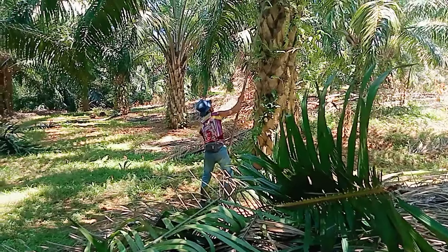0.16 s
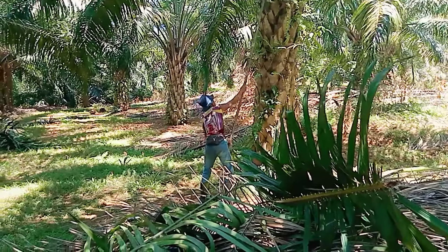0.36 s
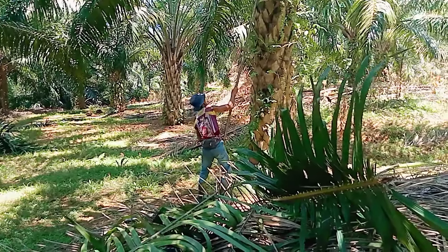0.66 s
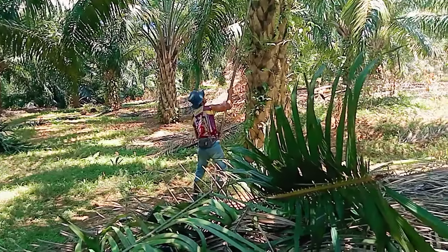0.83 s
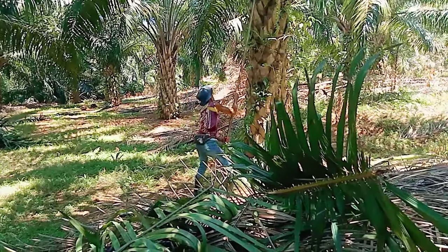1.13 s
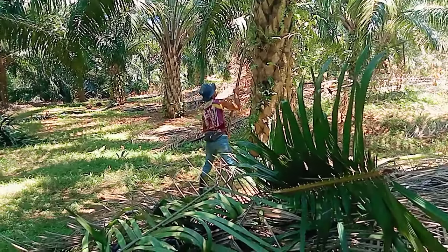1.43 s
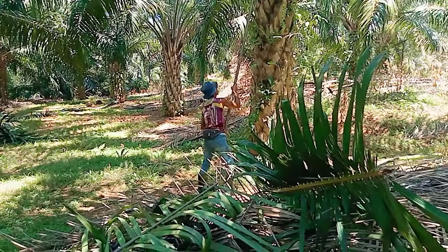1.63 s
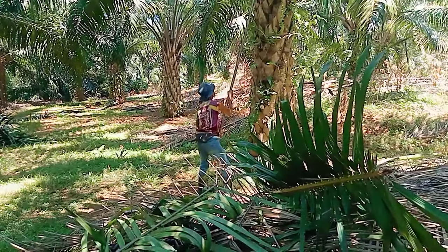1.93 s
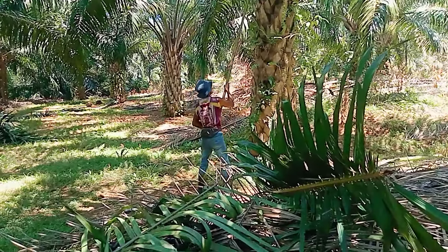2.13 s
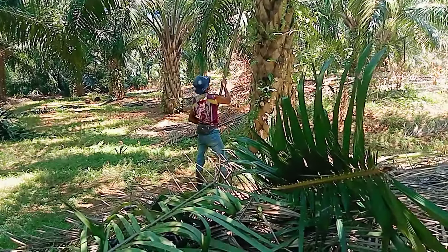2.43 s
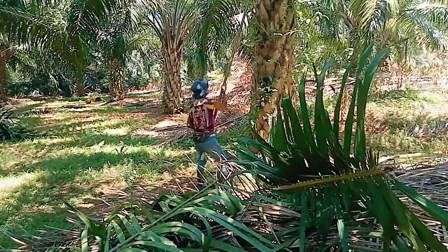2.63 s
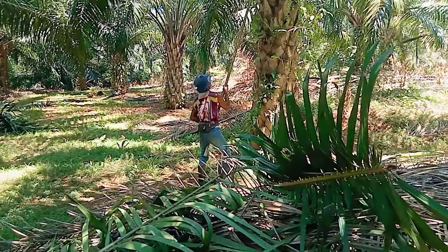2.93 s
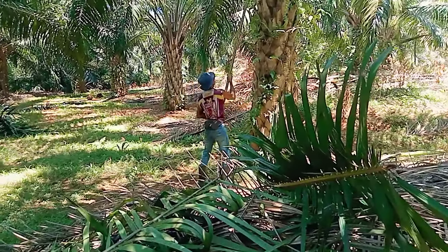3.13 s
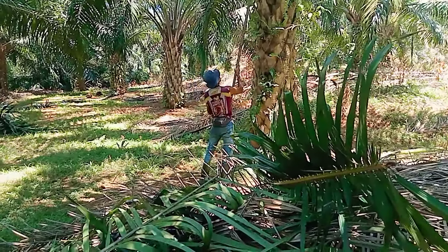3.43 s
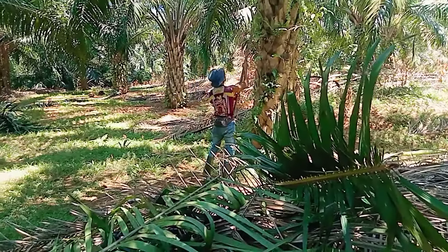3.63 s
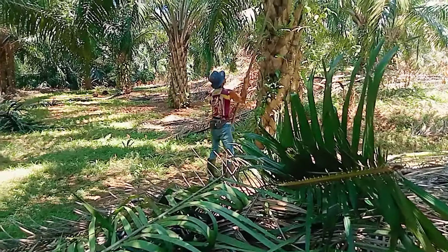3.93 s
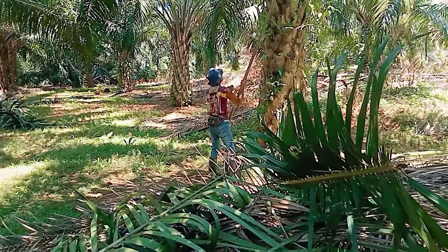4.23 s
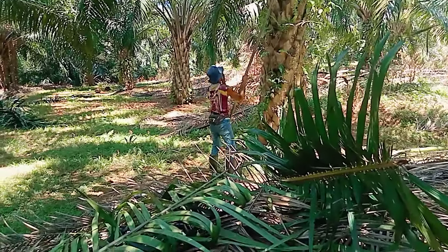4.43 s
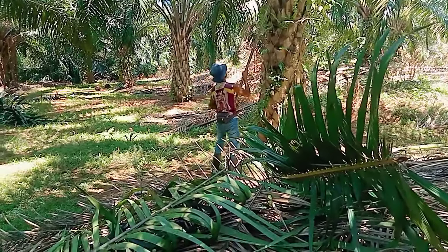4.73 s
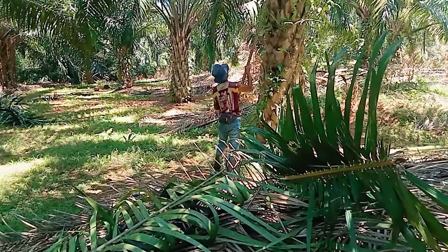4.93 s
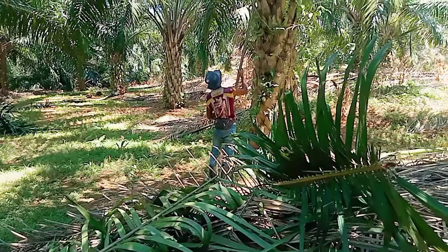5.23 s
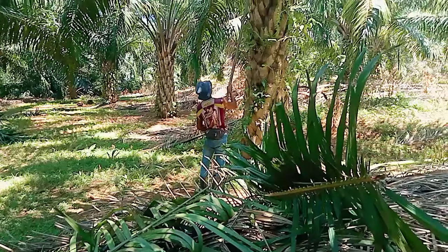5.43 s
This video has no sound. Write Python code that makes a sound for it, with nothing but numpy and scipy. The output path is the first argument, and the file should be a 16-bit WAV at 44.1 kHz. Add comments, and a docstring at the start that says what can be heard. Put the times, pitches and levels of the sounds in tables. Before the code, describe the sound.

A blade rasps through wet palm fibre with hollow knocks and cracks, then a frond tears loose and crashes down amid shrill insects.

```python
"""A blade rasps through wet fibre in short pulls, stalks knock and crack, and a palm frond tears loose and
crashes down through the leaves, while insects drone in the trees: a harvester works a sickle on a long pole.
Fibres and foliage are coloured trains of random clicks, stalks and steel are decaying modes, the pole is
a bank of resonators driven by the work. Insects are a click band with wavering tones; a noise tail is the
echo of the grove, and coloured noise is the open air."""
import sys
import numpy as np
from scipy import signal
from scipy.fft import rfft, irfft, next_fast_len
from scipy.io import wavfile

SR = 44100
rng = np.random.default_rng(int(sys.argv[2]) if len(sys.argv) > 2 else 0)


def materialize(psi):
    """Save the field psi as 16-bit PCM at rate SR to the path in sys.argv[1].

    A 1-D psi becomes a single channel; in a 2-D psi each row is a channel.
    """
    bounded = np.clip(np.atleast_2d(psi).T, -1, 1)
    quanta = np.round(bounded * 32767).astype(np.int16)
    wavfile.write(sys.argv[1], SR, quanta)


N = 245637
TIME = np.arange(N) / SR


def from_db(db):
    """Amplitude ratio: 20 dB for each factor of ten."""
    return 10 ** (np.asarray(db) / 20)


def rms_one(x):
    """Power normalisation: scale to a mean square of 1."""
    return x / np.sqrt(np.mean(x ** 2) + 1e-20)


def in_time(rows):
    """Linear interpolation: each column becomes a curve over time."""
    seconds, *columns = np.transpose(rows)
    return [np.interp(TIME, seconds, column) for column in columns]


def colour(x, spectrum):
    """Spectral shaping: weight x on a log-frequency axis, 20 dB per octave down beyond the ends; rms 1."""
    hz, db = np.transpose(spectrum)
    size = next_fast_len(N)
    octave = np.log2(np.fft.rfftfreq(size, 1 / SR) + 1)   # the 1 avoids log of zero
    points = np.log2(hz)
    beyond = np.abs(octave - np.clip(octave, points[0], points[-1]))
    gain = from_db(np.interp(octave, points, db) - 20 * beyond)
    return rms_one(irfft(rfft(x, size) * gain, size)[:N])


def below(x, hz):
    """First-order low-pass filtering; x minus this is the matching high-pass."""
    return signal.lfilter(*signal.butter(1, min(hz, SR / 2 - 1), fs=SR), x)


def drift(rate):
    """Slow random modulation: noise knots, rate per second, joined by lines; rms 1."""
    knots = rng.standard_normal(N)
    return rms_one(np.interp(TIME * rate, np.arange(N), knots))


def crackle(per_s, spread_db):
    """Random impulse train: independent clicks whose dB sizes are exponential, so a few stand far out."""
    sizes = from_db(spread_db * np.minimum(rng.exponential(1, N), 4))
    signs = rng.choice([-1, 1], N)
    return sizes * signs * (rng.random(N) < per_s / SR)


def ring(x, hz, t60):
    """Resonance: a two-pole filter in which a unit click starts a dying cosine of height 1."""
    radius = from_db(-60 / (t60 * SR))
    angle = 2 * np.pi * hz / SR
    zeros = [1, -radius * np.cos(angle)]
    poles = [1, -2 * radius * np.cos(angle), radius * radius]
    return signal.lfilter(zeros, poles, x + 1e-18)   # the offset keeps numbers out of the slow tiny range


def dying(t, t60):
    """Exponential decay: 60 dB down after t60 seconds."""
    return np.exp(-np.log(1000) * t / t60)


def add(out, s, sound):
    """Superposition: mix a sound in at time s."""
    start = int(s * SR)
    out[start:start + len(sound)] += sound[:N - start]


def swell_and_fade(s, swell_s, fade_s):
    """Exponential growth and decay: gain peaks at s; each slope is the time for 20 dB."""
    slopes = np.maximum((s - TIME) / swell_s, (TIME - s) / fade_s)
    return from_db(np.maximum(-20 * slopes, -120))


# Pulls of the blade through fibre. Each row: peak in seconds, level in dB, swell in seconds per 20 dB,
# brightness in dB (the gain of the edge; the body moves the other way by a quarter of it).
PULLS = [(.175, -48.5, .14, 0), (.512, -42, .011, 7), (.734, -35.5, .013, -3), (.812, -42, .19, 2),
         (1.232, -41.5, .1, -2), (1.333, -39.5, .01, 5), (1.379, -20.8, .05, 0), (1.41, -25.3, .012, 3),
         (1.455, -44, .1, 2), (1.488, -40, .02, -9), (1.822, -44.5, .035, -12), (2.15, -36, .03, 2),
         (2.202, -35.5, .022, -9), (2.355, -51, .06, -4), (2.381, -42.5, .018, 3), (2.6, -54, .04, -3),
         (2.928, -30.8, .05, -1), (2.985, -50, .08, 3), (3.27, -50, .04, -6), (3.297, -33, .016, -5),
         (3.565, -56, .03, 5), (4.083, -39, .025, -7)]
# Spectrum of parting fibre. Each row: frequency in Hz, relative density in dB per Hz.
FIBRE = [(100, -17), (220, -8), (420, -7), (620, -2), (950, -6), (1400, -6.5), (3000, -7.5), (3700, -12),
         (4900, -21), (6300, -17), (7500, -6), (9700, -21), (12500, -24), (15500, -24)]
# a pull fades by 20 dB in this time plus a share of its swell: slow pulls let go slowly
RELEASE_S, RELEASE_SHARE = .036, .22


def pulls():
    """Stick-slip friction: the blade parts thousands of fibres a second, catching and slipping as it goes."""
    catching = from_db(1.8 * drift(350))
    fibres = colour(crackle(per_s=11000, spread_db=3.0) * catching, FIBRE)
    body = below(fibres, hz=1700)
    edge = fibres - body
    body_power = edge_power = 0
    for s, db, swell, bright_db in PULLS:
        gain = from_db(db) * swell_and_fade(s, swell, RELEASE_S + RELEASE_SHARE * swell)
        body_power = body_power + gain ** 2 / from_db(bright_db / 2)
        edge_power = edge_power + gain ** 2 * from_db(bright_db) ** 2
    return body * np.sqrt(body_power) + edge * np.sqrt(edge_power)


# Chops that split a stalk. Each row: time of the crack in seconds, level in dB, settled pitch of the crack
# in Hz, settled pitch of the stalk giving way in Hz, splintering in dB re the crack.
CHOPS = [(2.1485, -18, 1250, 620, -9), (2.375, -24.5, 1500, 1100, -9), (2.593, -38, 400, 280, -5),
         (2.9283, -16, 1600, 640, -10.5), (3.2915, -15, 480, 270, -10.5), (4.3836, -11, 820, 680, -7.5)]
# Knocks against the stalks; the last row is a high second note of the final crack, played like a knock. Each
# row: start in seconds, level in dB, settled pitch in Hz.
KNOCKS = [(.737, -28.5, 1130), (1.188, -41, 600), (1.294, -29.5, 570), (1.368, -18, 560),
          (1.484, -27.5, 760), (1.816, -33, 430), (2.199, -23.5, 720), (2.209, -33, 260), (2.228, -35, 400),
          (2.856, -30, 640), (2.997, -34, 350), (3.338, -37, 330), (4.064, -30, 230), (4.075, -27, 420),
          (4.273, -24, 900), (4.331, -27, 830), (4.385, -12.5, 1520)]
# Dry leaflets and twigs snapping. Each row: start in seconds, level in dB.
SNAPS = [(1.063, -53), (1.305, -37), (2.098, -48), (2.332, -47), (2.479, -44.5), (2.593, -47), (2.856, -42),
         (4.225, -35), (5.028, -34)]
# Every "CYCLES" of ringing is the number in which a note dies by 60 dB; splintering is in dB re the blow.
KNOCK_CYCLES, KNOCK_SPLINTER_DB = 23, -16
CRACK_CYCLES = 14
# the stalk gives way with a thud just before it cracks: lead, level re the crack
GIVE_LEAD_S, GIVE_DB, GIVE_CYCLES = .0077, -7, 14
# the frond's last strands part one after another, at even steps
TEAR_S, TEAR_STEP_S, TEAR_DB = 4.2655, .0447, -16.5
TEAR_HZ, TEAR_CYCLES, TEAR_SPLINTER_DB = 800, 13, -21
SNAP_HZ, SNAP_CYCLES, SNAP_SPLINTER_DB = 1700, 36, -2
# cycles over which a note builds up: brittle breaks are sudden, knocks on wet stalks are soft
BREAK_CONTACT_CYCLES, KNOCK_CONTACT_CYCLES = .8, 1.15


def blows(strands=3):
    """Impact and fracture: lists every blow as (s, dB, Hz, ringing cycles, splinter dB, contact cycles)."""
    gives = [(s - GIVE_LEAD_S, db + GIVE_DB, hz, GIVE_CYCLES, KNOCK_SPLINTER_DB) for s, db, _, hz, _ in CHOPS]
    cracks = [(s, db, hz, CRACK_CYCLES, splinter_db) for s, db, hz, _, splinter_db in CHOPS]
    tears = [(TEAR_S + k * TEAR_STEP_S, TEAR_DB, TEAR_HZ, TEAR_CYCLES, TEAR_SPLINTER_DB)
             for k in range(strands)]
    snaps = [(s, db, SNAP_HZ, SNAP_CYCLES, SNAP_SPLINTER_DB) for s, db in SNAPS]
    breaks = [(*blow, BREAK_CONTACT_CYCLES) for blow in gives + cracks + tears + snaps]
    soft = [(s, db, hz, KNOCK_CYCLES, KNOCK_SPLINTER_DB, KNOCK_CONTACT_CYCLES) for s, db, hz in KNOCKS]
    return breaks + soft


# Modes of a stalk. Each row: multiple of its pitch, mean level in dB, share of the note's t60.
STALK = [(.4, -23, 1.2), (.65, -12, 1), (1, -1, 1), (1.8, -10, .9), (2.5, -21, .7)]


def knocks(splinter_t60=.016, glide=.3, settle_s=.003):
    """Modal vibration: a wet stalk gives a short hollow note; splitting fibres add a crack on top."""
    out, t = np.zeros(N), TIME[:SR // 5]
    splinters = colour(crackle(per_s=16000, spread_db=2.4), FIBRE)
    splinters = rms_one(splinters - below(splinters, hz=1500))
    # bending waves carry high notes fastest, so each note starts sharp and settles
    swept = t + glide * settle_s * (1 - np.exp(-t / settle_s))
    for s, db, hz, cycles, splinter_db, contact_cycles in blows():
        note = 0
        for k, (ratio, mode_db, share) in enumerate(STALK):
            level = from_db(mode_db + rng.standard_normal())   # each blow excites the modes a little differently
            tone = np.sin(2 * np.pi * hz * ratio * swept)
            note = note + level * (-1) ** k * tone * dying(t, share * cycles / hz)
        pressed = 1 - np.exp(-t * hz / contact_cycles)   # thick, low stalks give way more slowly
        crack = from_db(splinter_db) * splinters[int(s * SR):][:len(t)] * dying(t, splinter_t60)
        add(out, s, from_db(db) * (pressed * note + crack))
    return out


# Modes of the pole. Each row: frequency in Hz, gain in dB, t60 in seconds.
POLE = [(200, -46, .05), (310, -52, .05), (525, -44, .035), (632, -44, .045), (818, -56, .08),
        (1182, -48, .06), (1712, -55, .09), (2200, -50, .04)]


def pole(force):
    """Forced resonance: the hollow pole rings along with whatever shakes its tip."""
    return sum(from_db(db) * ring(force, hz, t60) for hz, db, t60 in POLE)


# The steel sickle rings when it springs free. Each row: start in seconds, level of the stronger mode in dB,
# its frequency in Hz, t60 in seconds.
BLADE = [(3.292, -35, 2920, .2), (3.557, -51, 3540, .15)]


def blade(pair_hz=45, wobble=.7):
    """Beating: two close modes of the sickle die together, unsettled by fibres that still touch the steel."""
    out, t = np.zeros(N), TIME[:SR // 2]
    for s, db, hz, t60 in BLADE:
        phase = 2 * np.pi * hz * t + wobble * drift(200)[:len(t)]
        pair = np.sin(phase) + .5 * np.sin(phase + 2 * np.pi * pair_hz * t)
        add(out, s, from_db(db) * dying(t, t60) * pair)
    return out


# rustle re the pull, its build-up added to the pull's swell, its fading (both seconds per 20 dB)
SHAKE_DB, SHAKE_RISE_S, SHAKE_FADE_S = -21, .04, .5
SHAKE_FOLLOWS, USUAL_PULL_DB = .72, -40   # share of a pull's extra dB that reaches the leaves
SHAKE_DB_PER_DOUBLING, USUAL_SWELL_S = 1.2, .04   # a swell twice as long shakes the crown this much more


def crown_shake():
    """Vibration transmission: every pull shakes the crown, whose leaves go on rustling; powers add."""
    power = 0
    for s, db, swell, _ in PULLS:
        force_db = SHAKE_FOLLOWS * (db - USUAL_PULL_DB)
        length_db = SHAKE_DB_PER_DOUBLING * np.log2(swell / USUAL_SWELL_S)
        level = from_db(USUAL_PULL_DB + SHAKE_DB + force_db + length_db)
        power = power + (level * swell_and_fade(s, SHAKE_RISE_S + swell, SHAKE_FADE_S)) ** 2
    return np.sqrt(power)


def weigh(rustle, weight_db, crisp_db):
    """Shelving: set the gain of the low end and of the crisp top."""
    low = below(rustle, hz=1100)
    high = rustle - below(rustle, hz=6000)
    return rustle + (from_db(weight_db) - 1) * low + (from_db(crisp_db) - 1) * high


# Spectrum of the foliage. Each row: frequency in Hz, relative density in dB per Hz.
FOLIAGE = [(60, -10), (200, -5), (280, -2), (800, -2), (1200, -6), (3400, 0), (3900, -4), (5200, -17),
           (6400, -10), (7400, 0), (8300, -6), (10300, -15), (13700, -11), (15500, -12)]
# Rustle of the frond crashing down. Each row: time in seconds, level in dB before the gain FALL_DB.
FALL = [(4.086, -46.0), (4.111, -49.0), (4.225, -42.8), (4.36, -46.2), (4.385, -38.6), (4.515, -44.3),
        (4.605, -41.0), (4.719, -44.0), (4.894, -39.3), (5.118, -52.7), (5.213, -53.2), (5.243, -49.2),
        (5.458, -55.6), (5.557, -52.8)]
FALL_S, FALL_ATTACK_S, FALL_DB = 4.066, .008, 3   # the rustle of the fall sets in at once
# the heavy stalk drags first, then only the light leaflets move: low end and crispness before and after
STALK_WEIGHT_DB, LEAFLET_WEIGHT_DB, STALK_CRISP_DB, LEAFLET_CRISP_DB = 7, -2, -2.5, 1.2
LIGHTEN_S, LIGHTEN_OVER_S = 4.3, .27
CROWN_WEIGHT_DB, CROWN_CRISP_DB = -3.5, -.5


def leaves(tick_cycles=12):
    """Random multiple impacts: leaflets brush in clumps and tick, each at its own pitch."""
    clumps = from_db(1.5 * drift(70))
    brush = colour(crackle(per_s=10000, spread_db=2.8) * clumps, FOLIAGE)
    ticks = 0
    for hz in np.geomspace(500, 13000, 20):
        # high ticks die sooner, so they start taller to carry their share
        ticks = ticks + hz ** .85 * ring(crackle(per_s=45, spread_db=3.5), hz, tick_cycles / hz)
    rustle = from_db(-1.4) * brush + from_db(-5) * colour(ticks, FOLIAGE)
    fall_db, = in_time(FALL)
    fall = from_db(FALL_DB + fall_db) * np.clip((TIME - FALL_S) / FALL_ATTACK_S, 0, 1)
    weight_db, crisp_db = in_time([(LIGHTEN_S, STALK_WEIGHT_DB, STALK_CRISP_DB),
                                   (LIGHTEN_S + LIGHTEN_OVER_S, LEAFLET_WEIGHT_DB, LEAFLET_CRISP_DB)])
    frond = fall * weigh(rustle, weight_db, crisp_db)
    crown = crown_shake() * weigh(rustle, CROWN_WEIGHT_DB, CROWN_CRISP_DB)
    return frond + crown


def grove(x, first_s=.008, treble_t60=.3, bass_share=.55):
    """Scattering: trunks and fronds return a thin tail; long waves mostly pass, and treble dies first."""
    t = TIME[:SR]
    build_up = 1 - np.exp(-(t / first_s) ** 2)
    scatter = rng.standard_normal(len(t)) * (rng.random(len(t)) < .08) * build_up
    scatter = scatter - (1 - bass_share) * below(scatter, hz=1500)
    dull = below(scatter, hz=4000)
    tail = dull * dying(t, .42) + (scatter - dull) * dying(t, treble_t60)
    return from_db(-16) * signal.fftconvolve(x, tail / np.linalg.norm(tail))[:N]


# Spectrum of the chorus. Each row: frequency in Hz, relative density in dB per Hz.
DRONE = [(6000, -36), (6550, -20), (6850, -7), (7040, 1), (7200, -3), (7380, -1), (7520, -5), (7680, -2),
         (7880, -9), (8100, -19), (8700, -27), (9800, -40)]
# Swell of the insects. Each row: time in seconds, mean level of the chorus in dB.
INSECTS = [(0, -56), (1.9, -54.5), (4, -56)]
# Notes of the nearest insects. Each entry: frequency in Hz.
SINGERS_HZ = [7000, 7060, 7290, 7390, 7620]


def insects():
    """Incoherent summation: many far drum clicks merge into a shrill band; a few nearer notes waver."""
    chorus_db, = in_time(INSECTS)
    chorus = colour(crackle(per_s=12000, spread_db=1.5), DRONE)
    singers = rms_one(sum(np.sin(2 * np.pi * hz * TIME + 2 * drift(40)) * drift(10) for hz in SINGERS_HZ))
    return (chorus + from_db(-6) * singers) * from_db(chorus_db + .6 * drift(60))


# Faint far chirps. Each row: time of the peak in seconds, peak level in dB, frequency in Hz.
CHIRPS = [(3.762, -68, 8800), (3.815, -73, 5400), (3.945, -71, 5450)]
CHIRP_S = .018   # standard deviation of the bell-shaped envelope


def chirps(blur=1.5):
    """Phase modulation: thin high notes from far off, blurred by the foliage."""
    waver = blur * drift(400)   # radians
    out = np.zeros(N)
    for s, db, hz in CHIRPS:
        bell = np.exp(-((TIME - s) / CHIRP_S) ** 2 / 2)
        out += from_db(db) * bell * np.sin(2 * np.pi * hz * TIME + waver)
    return out


# Spectrum of the open air. Each row: frequency in Hz, relative density in dB per Hz.
AIR = [(25, -29), (48, -14), (70, 1), (100, -3), (200, -8), (400, -12), (1000, -15), (2000, -19.5),
       (3400, -20), (4800, -32), (8500, -30), (11500, -38), (15000, -31)]


def open_air():
    """Broadband noise: a steady, mostly low murmur."""
    return from_db(-58.5) * colour(rng.standard_normal(N), AIR)


def scene():
    """Superposition: the work at the palm, its echo among the trunks, insects and open air."""
    work = pulls() + knocks()
    near = work + pole(work) + blade() + leaves()
    return (near + grove(near) + insects() + chirps() + open_air())[None]


def record(dry):
    """Band limiting: an elliptic low-pass cuts the top steeply at 15.8 kHz."""
    return signal.sosfilt(signal.ellip(12, .1, 80, 15800, fs=SR, output="sos"), dry)


dry = scene()
out = record(dry)
materialize(out)
```